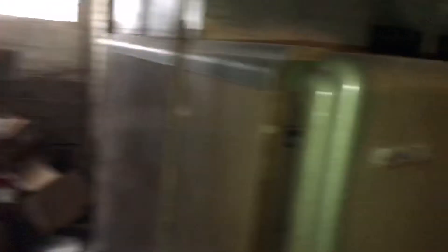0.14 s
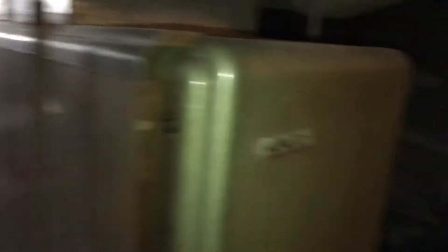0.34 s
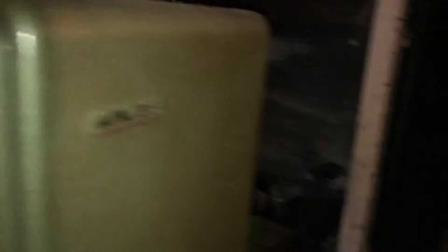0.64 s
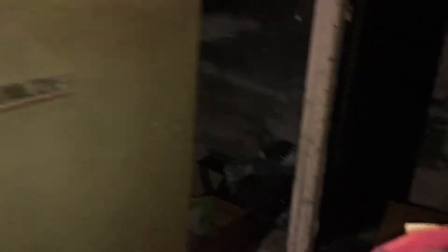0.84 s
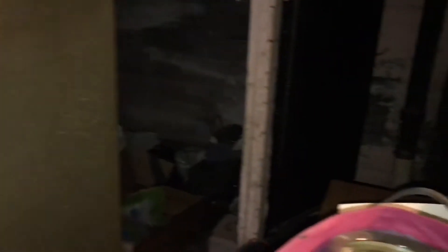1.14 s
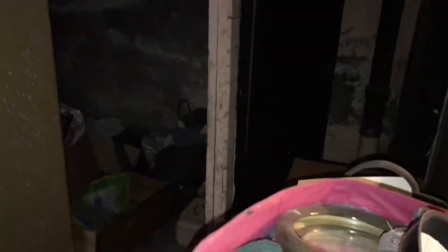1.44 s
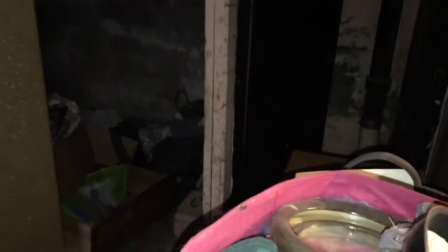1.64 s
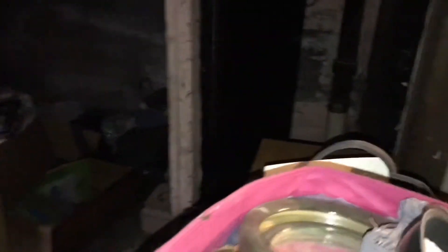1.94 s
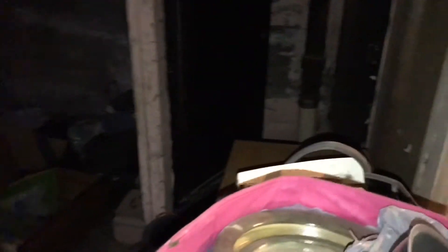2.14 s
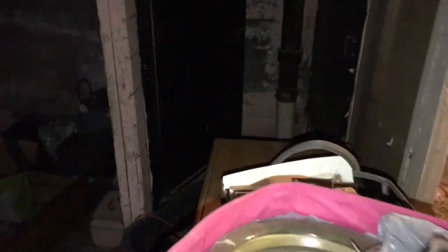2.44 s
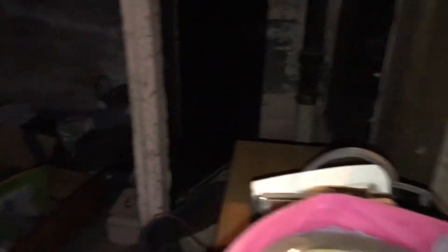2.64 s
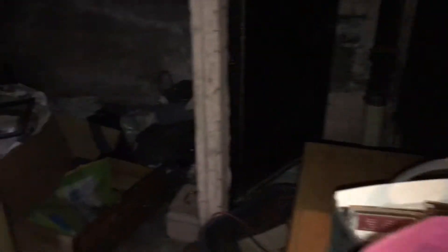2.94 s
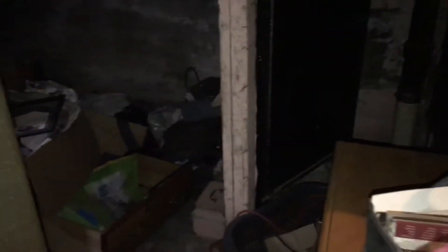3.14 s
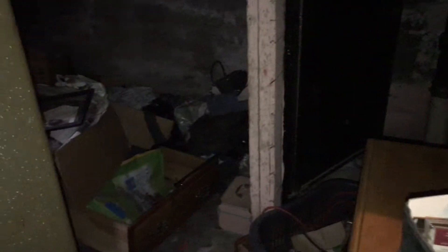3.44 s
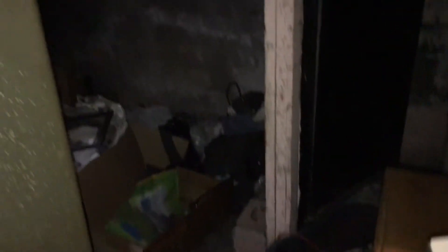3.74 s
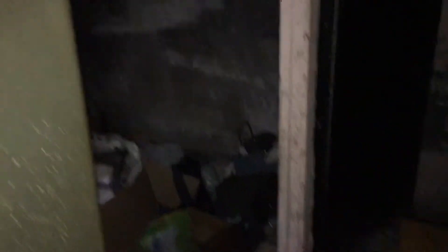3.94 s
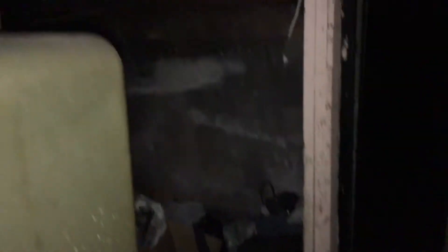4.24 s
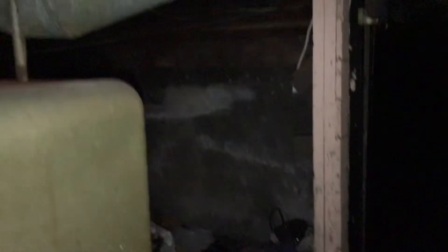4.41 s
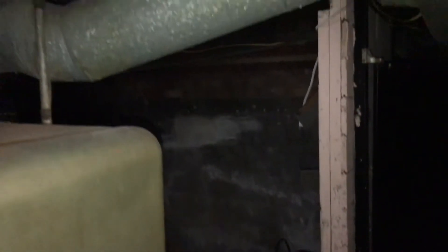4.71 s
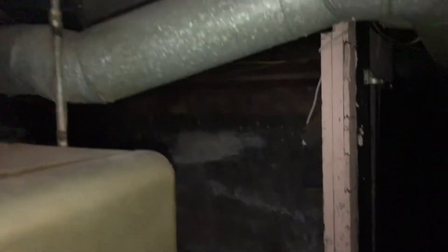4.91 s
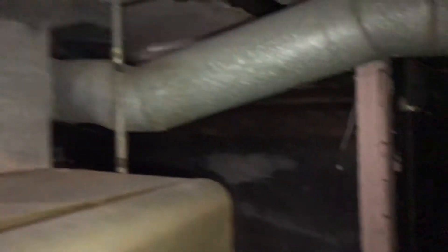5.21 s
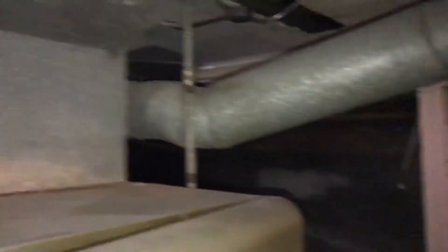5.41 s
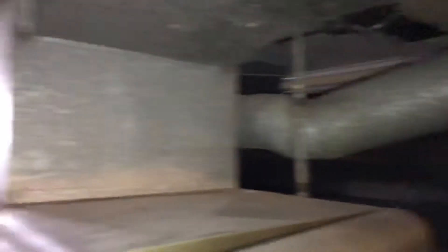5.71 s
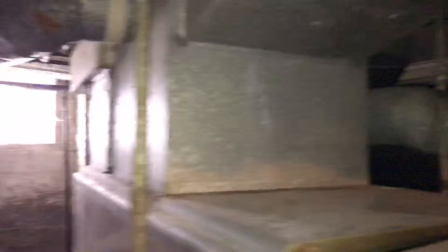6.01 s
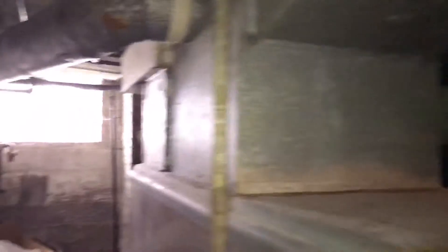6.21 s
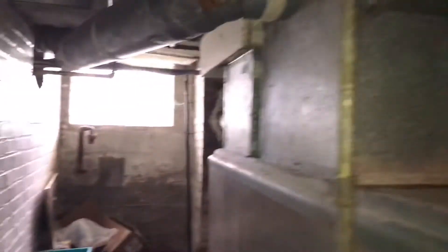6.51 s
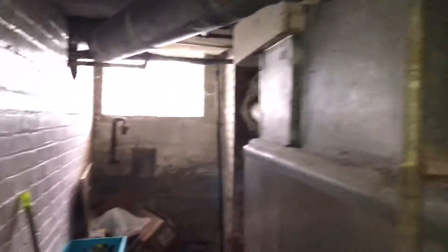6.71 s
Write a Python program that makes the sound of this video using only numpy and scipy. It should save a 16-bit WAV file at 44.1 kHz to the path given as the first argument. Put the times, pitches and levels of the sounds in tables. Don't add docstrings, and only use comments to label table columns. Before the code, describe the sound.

A furnace blower drones and throbs loudly in a basement, with rushing duct air, thin whistles, and faint shoe scuffs and clothing rustles close by.

```python
import sys
import numpy as np
from scipy import signal
from scipy.fft import rfft, irfft, next_fast_len
from scipy.io import wavfile
from scipy.ndimage import uniform_filter1d, map_coordinates

SR = 44100
rng = np.random.default_rng(int(sys.argv[2]) if len(sys.argv) > 2 else 0)


def generate_wav(signal):
    frames = np.transpose(np.atleast_2d(signal))
    scaled = np.clip(frames, -1, 1) * 32767
    pcm = np.round(scaled).astype(np.int16)
    wavfile.write(sys.argv[1], SR, pcm)


def elevation(decibels):
    levels = np.asarray(decibels, float)
    return 10 ** (levels / 20)


N = 302526
STEP = 16

BELT_HZ = 7.3665
MAINS_HZ = 120.0
WHEEL_HZ, WHEEL_DB = 90.74, -44
SPLICE_S, WHEEL_S = .1191, .0083
# (multiple of the belt turn, level [dB rms])
BELT_ORDERS = [(5, -55.5), (8, -41), (9, -56), (10, -43.5), (11, -47), (12, -42), (13, -37), (14, -49.5),
               (15, -59), (16, -80), (18, -51), (19, -45.5), (20, -55), (21, -54.5), (22, -58.5),
               (23, -55.5), (24, -44), (29, -58.5), (30, -57.5), (31, -59.5), (32, -52.5), (34, -63),
               (36, -64), (37, -62), (40, -61), (42, -64.5), (45, -65.5), (47, -62), (48, -63.5)]
# (distance from the hum [belt turns], level [dB rms])
HUM_LINES = [(-11.5, -64), (-9.5, -53), (0, -42.5), (-3.5, -77), (6, -65), (4.5, -56.5), (6, -51),
             (17, -59), (21.5, -72)]
# (centre [Hz], width [Hz], level [dB rms])
LOOSE_PANELS = [(267.3, 18, -54.5), (300.8, 28, -55.5)]
# (frequency [Hz], density [dB per Hz])
RUMBLE_SPECTRUM = [(20, -30), (32, -35), (45, -3), (90, 4), (140, -5), (200, -5), (300, -13.5), (400, -18),
                   (600, -33)]
RUMBLE_DB = -43

# (time [s], level [dB])
MIC_FACING = [(0, 2.5), (.7, 0.5), (1.5, -1), (2.3, -2.5), (3, -2.5), (3.6, -2.5), (4.2, -2), (4.8, -1.5),
              (5.4, -0.5), (6, 2), (6.5, 2.5), (6.86, 1)]
BOOM_FOLLOWS, ROAR_FOLLOWS, HISS_FOLLOWS = 1.05, 0.56, 1
# (time [s], half width [s], level [dB])
DRONE_PLACES = [(4.3, 0.53, 3.5), (5.3, 0.8, 6), (6.86, 0.45, -4)]
DRONE_DB = -1.03
# (time [s], half width [s], level [dB])
BUZZ_PLACES = [(0, 0.83, -2), (1.5, 0.53, 4.5), (5.3, 0.38, 5), (6.5, 0.46, -9)]
# (time [s], half width [s], level [dB])
UPPER_PLACES = [(3.3, 0.23, 3.5), (6.5, 0.97, -8)]

# (frequency [Hz], density [dB per Hz])
ROAR_SPECTRUM = [(250, -16.5), (390, 0), (680, -2), (1000, -6), (1580, -9), (2050, -16.5), (2800, -27)]
# (frequency [Hz], density [dB per Hz])
HISS_SPECTRUM = [(1400, -25), (2100, -4.5), (2800, -4), (3300, -2), (4300, -4.5), (4870, -11), (6200, -9),
                 (6500, -6.5), (7200, -11), (7500, -12.5), (9500, -15.5), (10600, -22), (12000, -16.5),
                 (15800, -21)]
ROAR_DB, HISS_DB = -51, -61.5
# (centre [Hz], width [Hz], level over the hiss [dB])
EDGE_TONES = [(654, 12, -5), (818, 22, -6.5), (1536, 6.6, -13.5), (3972, 40, -23), (5440, 60, -25),
              (6400, 240, -26), (7950, 120, -35.5)]
# (centre [Hz], width [Hz])
WHISTLE_BANDS = [(700, 6), (2365, 95), (3205, 150), (7240, 90), (3245, 40)]
# (time [s], half width [s], level [dB]))
PIPE_TONE = (-76, 0, [(.3, .3, 13), (2.3, .4, 14), (3, .4, 16), (5.5, .12, 12), (6.35, .3, 14)])
WHISTLE_LEVELS = [
    PIPE_TONE,
    (-71.5, 0, [(1.1, .4, 5), (2.9, .6, -4.5), (5.5, 0.37, 3), (6.6, 0.33, 7.5)]),
    (-73, 1.7, []),
    (-82.5, 1.5, []),
    (-94, 0, [(1, 1.8, 11)]),
]

# (time [s], peak level [dB], extra on the hollow middle mode [dB])
HEEL_KNOCKS = [
    (1.370, -42, -6),
    (6.325, -42, 1),
]
# (frequency [Hz], level [dB], decay by 60 dB [s])
SOLE_MODES = [(680, 0, .18), (1100, 0, .15), (1470, -6, .1)]
# (time [s], length [s], level [dB rms], centre [Hz])
SHOE_SCUFFS = [(.926, 0.042, -62, 6500), (.96, 0.038, -63, 4500), (1.365, 0.037, -48.5, 1350),
               (1.413, 0.083, -61, 1500), (1.462, 0.044, -68, 5500), (1.762, 0.043, -54.5, 1880),
               (1.763, 0.056, -61, 4200), (5.862, 0.026, -57, 3600), (5.871, 0.038, -52.5, 1490),
               (6.142, 0.044, -57.5, 4430), (6.321, 0.045, -53.5, 1700), (6.365, 0.074, -63, 1800)]
# (time [s], length [s], level [dB rms], centre [Hz])
SHOE_SQUEAKS = [(.165, .012, -62, 15500), (0.422, .028, -66, 6600), (0.923, 0.033, -53.5, 1860),
                (6.232, .016, -66, 13000), (6.317, 0.028, -62, 7500), (6.38, 0.24, -54.5, 425)]
# (time [s], level [dB rms])
HANDLING_TICKS = [(.166, -63), (0.409, -62), (.6, -70), (.625, -65), (5.7, -71), (5.817, -62)]
# (time [s], length [s], level [dB rms])
CLOTH_RUSTLES = [(0.023, .04, -70), (0.446, 0.14, -68), (.56, .11, -66.5), (.93, .05, -78),
                 (1.465, 0.042, -68), (1.756, 0.059, -63.5), (5.816, 0.05, -64.5), (5.858, 0.05, -66.5),
                 (6.136, .035, -68)]
TICK_S, TICK_HZ, TICK_OCTAVES = 0.0049, 10000, 0.86
CLOTH_HZ, CLOTH_OCTAVES = 10200, 1
SHOE_OCTAVES = 0.63
SQUEAK_OCTAVES = .036

TOP_HZ = 15775


def drive():
    boom = BOOM_FOLLOWS * facing()[::STEP]
    drone = spots(DRONE_PLACES)[::STEP] + DRONE_DB
    buzz = spots(BUZZ_PLACES)[::STEP]
    upper = spots(UPPER_PLACES)[::STEP]

    def place_db(hz):
        if hz < 135:
            return boom
        if hz < 165:
            return .2 * boom
        if hz < 185:
            return drone
        return buzz if hz < 260 else upper

    lines = tone(WHEEL_HZ, WHEEL_DB + 1.5 * boom, WHEEL_S)
    for order, db in BELT_ORDERS:
        hz = order * BELT_HZ
        scattered = abs(order - 12.5) > 2
        late_cycles = rng.uniform() * scattered + .5 * (order == 11)
        lines += tone(hz, db + place_db(hz), SPLICE_S + late_cycles / hz)
    for order, db in HUM_LINES:
        hz = MAINS_HZ + order * BELT_HZ
        lines += tone(hz, db + place_db(hz), rng.uniform())
    shaking = signal.resample_poly(lines, STEP, 1, padtype="line")[:N]
    for centre_hz, width_hz, db in LOOSE_PANELS:
        shaking += elevation(db + 3.1 * wobble(2.505)) * narrow(centre_hz, width_hz)
    swell_db = 0.33 * np.repeat(boom, STEP)[:N] + 1.24 * wobble(4.11)
    rumble = noise(lambda hz: elevation(along(RUMBLE_SPECTRUM, hz)))
    return shaking + elevation(RUMBLE_DB + swell_db) * rumble


def tone(hz, db, start_s):
    t = np.arange(0, N, STEP) / SR
    turn = 2 * np.pi * hz * (t - start_s) + (hz / 190) ** 2 * wobble(.8, STEP)
    return np.sqrt(2) * elevation(db + 0.0065 * hz * wobble(1.234, STEP)) * np.cos(turn)


def air():
    facing_db = facing()
    roar_db = ROAR_DB + ROAR_FOLLOWS * facing_db
    hiss_db = HISS_DB + HISS_FOLLOWS * facing_db
    motor = np.cos(2 * np.pi * 4 * BELT_HZ * np.arange(N) / SR)
    surge = wobble(8)
    roar_swell_db = .5 * surge + 0.31 * wobble(13) + 0.72 * motor
    hiss_swell_db = 0.65 * surge + 0.18 * wobble(13)
    roar = elevation(roar_swell_db) * noise(lambda hz: elevation(along(ROAR_SPECTRUM, hz)))
    hiss = elevation(hiss_swell_db) * noise(lambda hz: elevation(along(HISS_SPECTRUM, hz)))
    out = elevation(roar_db + 0.8) * unit(roar) + elevation(hiss_db - 2.5) * unit(hiss)
    for centre_hz, width_hz, db in EDGE_TONES:
        out += elevation(hiss_db + db + 1.6 * wobble(3)) * narrow(centre_hz, width_hz)
    return out


def whistles():
    facing_db = facing()
    out = np.zeros(N)
    for (centre_hz, width_hz), (db, follows, loud_spots) in zip(WHISTLE_BANDS, WHISTLE_LEVELS):
        voice = pure if width_hz < 10 else narrow
        level_db = db + follows * facing_db + spots(loud_spots) + 1.7 * wobble(20)
        out += elevation(level_db) * voice(centre_hz, width_hz)
    return out


def pure(centre_hz, width_hz):
    pitch_hz = centre_hz + width_hz / 4 * wobble(2.7)
    return np.sqrt(2) * np.cos(2 * np.pi * np.cumsum(pitch_hz) / SR)


def heels():
    out = np.zeros(N + SR)
    t = np.arange(SR // 4) / SR
    for s, db, hollow_db in HEEL_KNOCKS:
        ring = np.zeros(len(t))
        for (hz, level, t60), extra in zip(SOLE_MODES, (0, hollow_db, 0)):
            phase = rng.uniform(0, 2 * np.pi)
            ring += elevation(level + extra - 60 * t / t60) * np.sin(2 * np.pi * hz * t + phase)
        out[round(s * SR):][:len(t)] += elevation(db) * ring * (1 - np.exp(-t / .005))
    return out[:N]


def scuffs():
    out = np.zeros(N + SR)
    t = np.arange(SR // 4) / SR
    strokes = [(s, TICK_S, db, TICK_HZ, TICK_OCTAVES) for s, db in HANDLING_TICKS]
    strokes += [(*row, CLOTH_HZ, CLOTH_OCTAVES) for row in CLOTH_RUSTLES]
    strokes += [(*row, SHOE_OCTAVES) for row in SHOE_SCUFFS]
    strokes += [(*row, SQUEAK_OCTAVES * np.log2(row[-1] / 100)) for row in SHOE_SQUEAKS]
    for s, length, db, centre_hz, spread in strokes:
        rub = noise(lambda hz: np.exp(-(np.log2((hz + 1) / centre_hz) / spread) ** 2 / 2), size=len(t))
        grit = elevation(2.5 * unit(uniform_filter1d(rng.standard_normal(len(t)), size=40)))
        start = np.clip(t / (.22 * length), 0, 1)
        fade = np.clip((1.2 * length - t) / (.7 * length), 0, 1)
        tail = elevation(-9 - 60 * np.maximum(t - length, 0) / .25) * np.clip(t / length, 0, 1)
        out[round(s * SR):][:len(t)] += elevation(db) * rub * (unit(grit) * start * fade + tail)
    return out[:N]


def standing(x, depth_db):
    hz, _, z = signal.stft(x, SR, nperseg=4096)
    field = uniform_filter1d(rng.standard_normal(z.shape), size=3, axis=0)
    field = uniform_filter1d(field, size=14, axis=1)
    gain = elevation(depth_db * unit(field) / (1 + hz[:, None] / 12000))
    return signal.istft(z * unit(gain), nperseg=4096)[1][:N]


def facing():
    s, db = np.transpose(MIC_FACING)
    return np.interp(np.arange(N) / SR, s, db)


def spots(rows):
    t = np.arange(N) / SR
    return sum((db * np.exp(-((t - s) / half) ** 2) for s, half, db in rows), 0 * t)


def narrow(centre_hz, width_hz):
    return noise(lambda hz: 1 / (1 + (2 * (hz - centre_hz) / width_hz) ** 2))


def noise(gain, size=N):
    m = next_fast_len(size)
    spectrum = rfft(rng.standard_normal(m)) * gain(np.fft.rfftfreq(m, 1 / SR))
    return unit(irfft(spectrum, m)[:size])


def wobble(rate, step=1):
    coarse = np.arange(0, N + 64, 64)
    knots = rng.standard_normal(int(N * rate / SR) + 4)
    smooth = map_coordinates(knots, [coarse * rate / SR])
    return np.interp(np.arange(0, N, step), coarse, smooth)


def along(points, hz):
    f, v = np.transpose(points)
    return np.interp(np.log(hz + 1), np.log(f + 1), v, left=-120, right=-120)


def unit(x):
    return x / np.sqrt(np.mean(x ** 2) + 1e-20)


def scene():
    coloured = standing(air() + scuffs(), depth_db=2.5)
    return (drive() + whistles() + coloured + heels())[None]


def low_pass(x):
    return signal.sosfilt(signal.butter(12, 16270, fs=SR, output="sos"), x)


def record(dry):
    m = next_fast_len(N + SR // 4)
    passed = np.fft.rfftfreq(m, 1 / SR) < TOP_HZ
    mix = irfft(rfft(dry, m) * passed, m)[:, :N]
    return low_pass(mix)


dry = scene()
out = record(dry)
generate_wav(out)
```